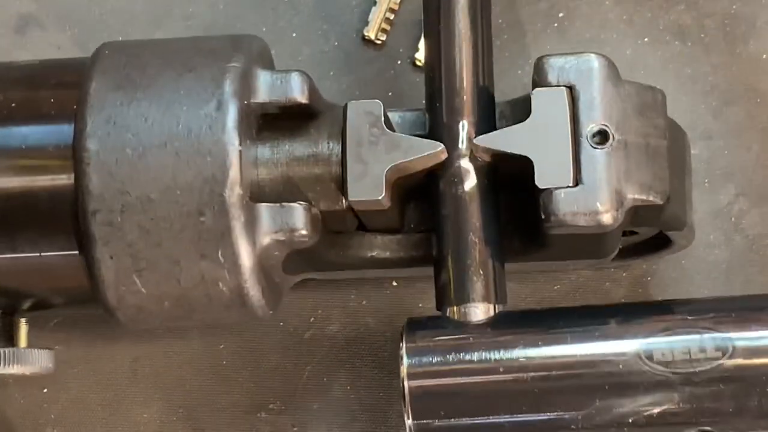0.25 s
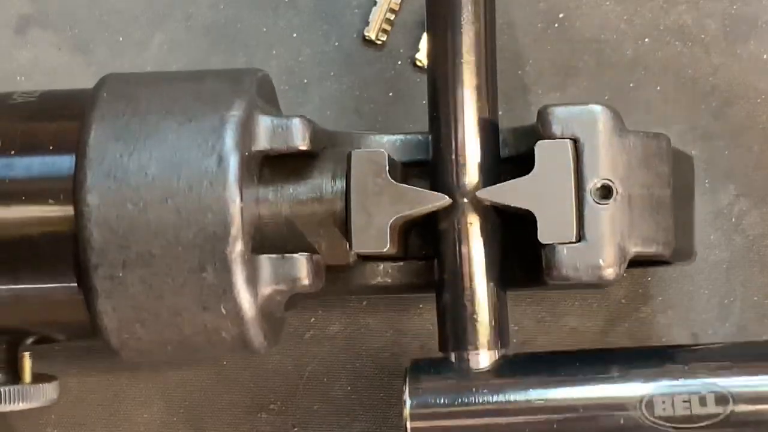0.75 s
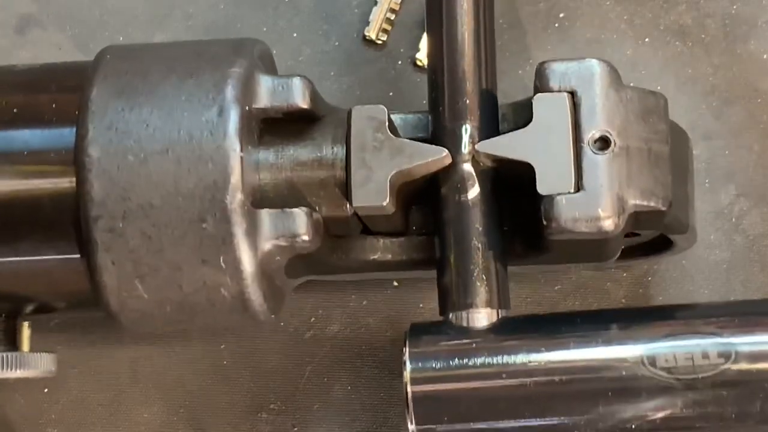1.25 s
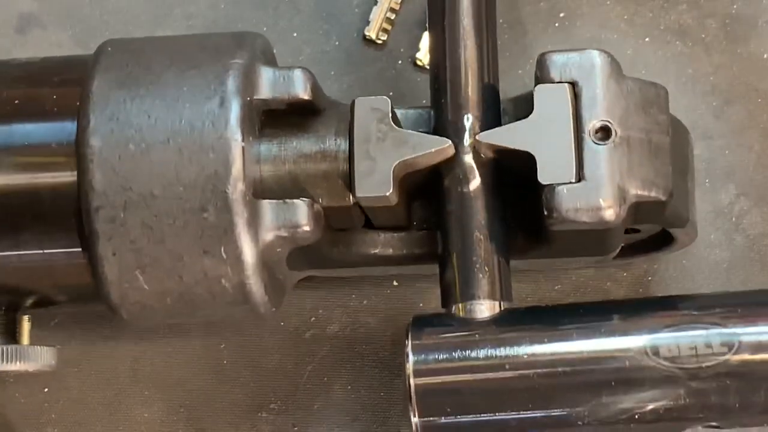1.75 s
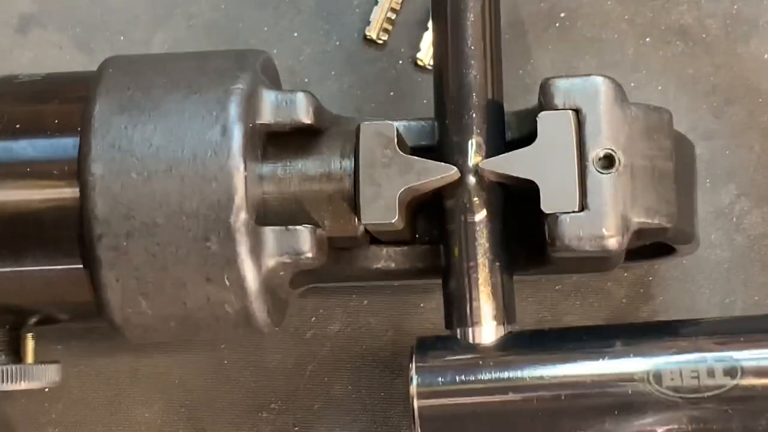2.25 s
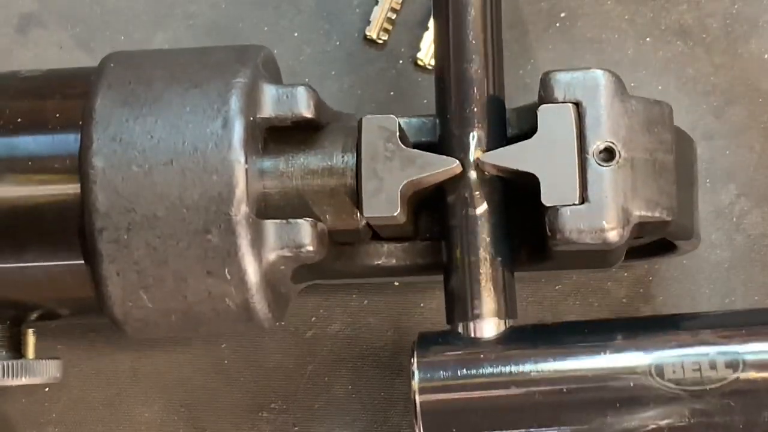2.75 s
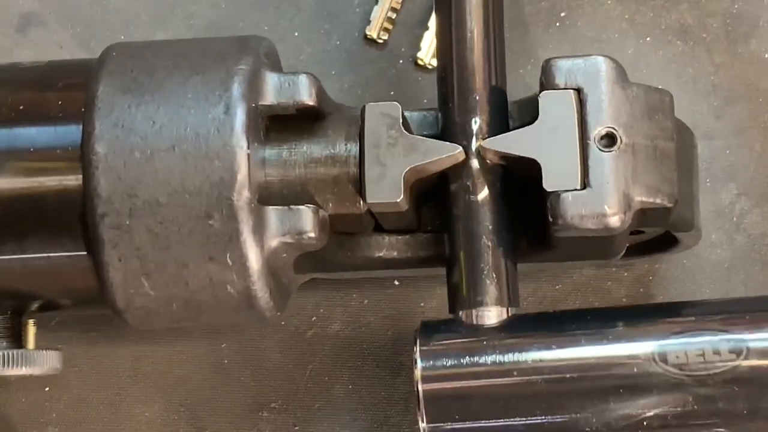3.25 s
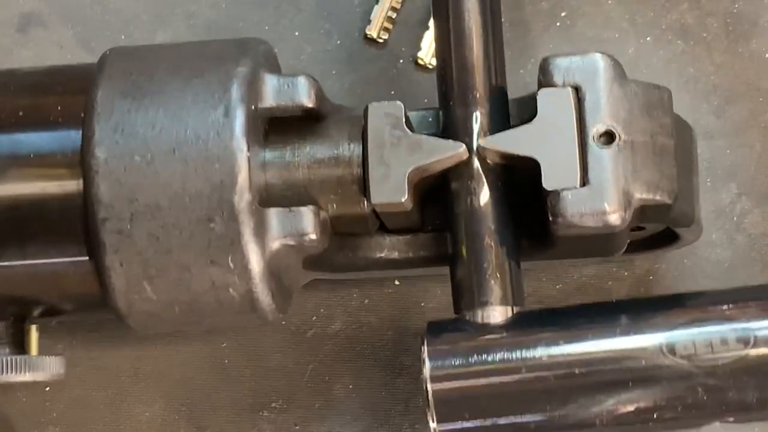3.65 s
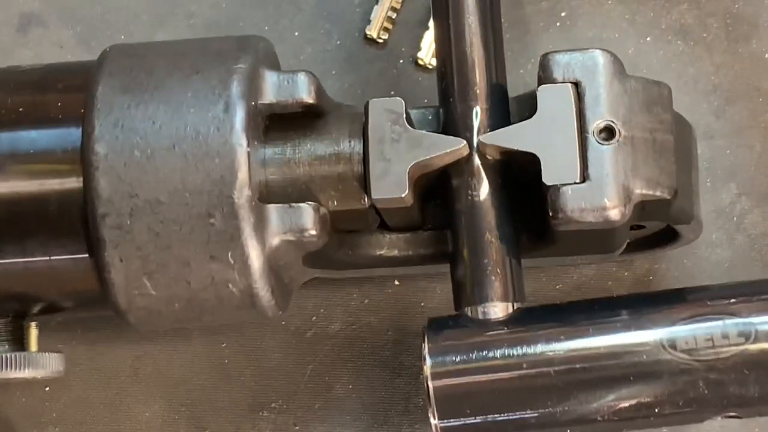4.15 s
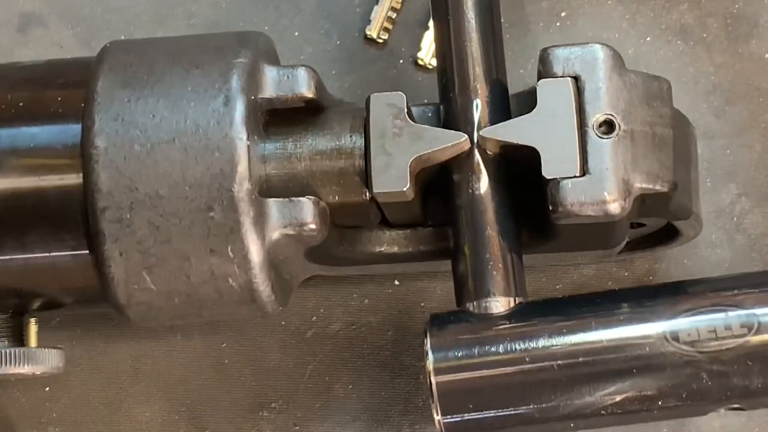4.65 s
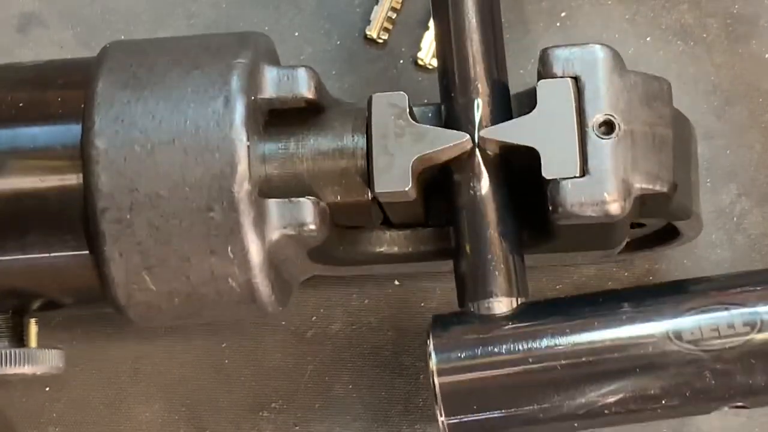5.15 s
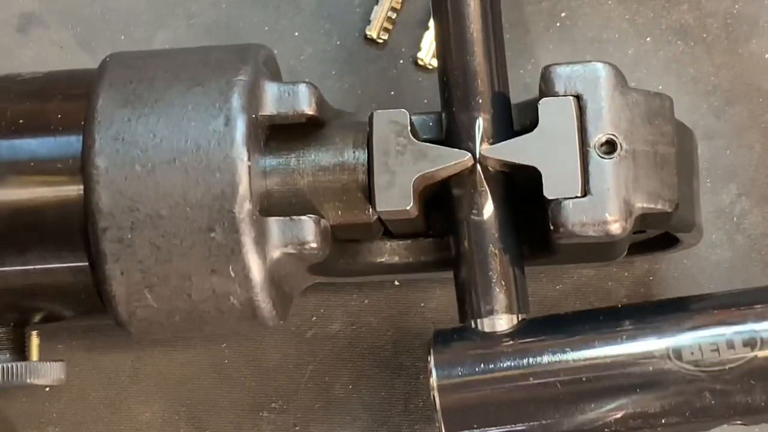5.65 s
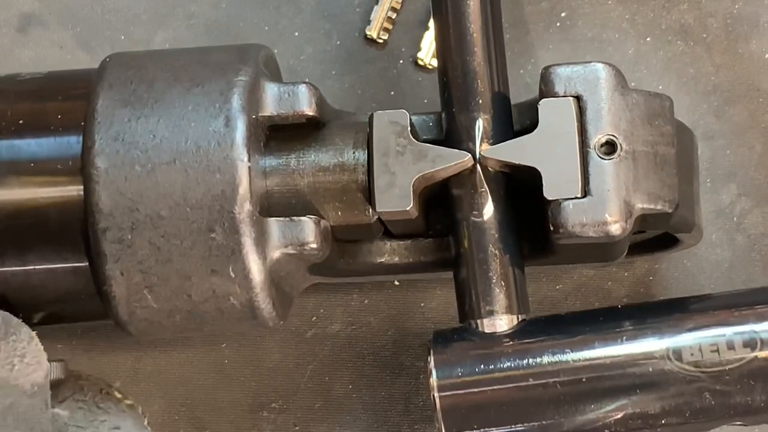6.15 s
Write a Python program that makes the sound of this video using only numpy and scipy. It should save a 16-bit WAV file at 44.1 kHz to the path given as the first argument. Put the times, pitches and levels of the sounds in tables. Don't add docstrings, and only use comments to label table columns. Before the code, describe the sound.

Seven lever strokes, roughly one every three quarters of a second, clack up and thud down on a resonant workbench. Small valves tick between them and loose keys jingle faintly. During the fifth stroke a steel shackle fractures with a violent, clipped bang, its halves ringing briefly in the short garage echo. The last strokes are easier, ending in faint rubbing, a tiny creak and low lamp hum.

```python
import sys
import numpy as np
from scipy import signal
from scipy.fft import rfft, irfft
from scipy.io import wavfile
from scipy.ndimage import uniform_filter1d

SR = 44100
rng = np.random.default_rng(int(sys.argv[2]) if len(sys.argv) > 2 else 0)


def linear_from_db(decibels):
    return 10 ** (np.asarray(decibels, float) / 20)


def dump_mix(stems):
    frames = np.atleast_2d(stems).T
    limited = np.clip(frames, -1, 1)
    pcm = np.round(limited * 32767).astype(np.int16)
    wavfile.write(sys.argv[1], SR, pcm)


N = 282681

# f/Hz, level/dB
CRACK_COLOUR = [(120, -31.5), (200, -4), (258, -22), (401, -10), (508, -9), (832, -10), (1360, -12.5),
                (2000, -9.5), (4200, -7.5), (5770, -13), (7400, -5.5), (9500, -13), (11000, -14.5),
                (12500, -20), (15800, -21.5)]
# f/Hz, T60/s
CRACK_T60 = [(200, 0.4), (1000, 0.31), (2500, 0.22), (4200, .3), (5700, .23), (8000, 0.17), (12000, 0.25),
             (16000, 0.23)]
# f/Hz, level/dB, T60/s
SHARD_MODES = [(335, -6, .2), (394, -2, .25), (3820, -7, .2), (4345, -7, .15), (7090, -4, .27),
               (7215, 0, .22), (8200, -6, .12), (8850, -13, .2), (9980, -12, .15), (10920, -3, .18),
               (12300, -14, .15), (15310, -16, .16)]
# t/s, main level/dB, upper level/dB, lower level/dB, damping factor/1
SHACKLE_KNOCKS = [(2.1, -41, -40, -36.5, 2.4), (2.109, -35.5, -34, -28.5, 1.5),
                  (2.558, -50, -41, -31.5, 0.7), (2.579, -40, -31, -50, 1.8), (2.596, -24, -27, -27.5, 1.8),
                  (2.619, -58, -34.5, -41, 1.4), (2.81, -18.5, -21, -23.5, 1.33),
                  (2.8197, -33, -28, -29.5, 1.5), (2.826, -30.5, -32, -32.5, 2.4),
                  (2.837, -32, -35, -32.5, 1.5), (3.27, -30.5, -32.5, -30, 1.7),
                  (3.286, -34, -22.5, -33.5, 1.3), (3.309, -21.5, -21.5, -24.5, 2.1),
                  (4.08, -32.5, -47, -38, 1.9)]
# f/Hz, level/dB, T60/s
STEEL_LOW = [(2640, -0.5, 0.086), (2770, -8.5, .06), (3094, -7.5, 0.035), (3640, -9, 0.074),
             (3950, -4, 0.14), (4340, -8.5, 0.088)]
# f/Hz, level/dB, T60/s
STEEL_FREE = [(7016, -16.5, 0.14), (7096, -3.5, 0.12), (7300, -9, 0.12), (7000, -16.5, 0.4)]
# f/Hz, level/dB, T60/s
STEEL_LOADED = [(7150, -5, 0.12), (7260, -14, 0.3), (7260, -16, .15), (7056, -23, 0.12)]
# f/Hz, level/dB, T60/s
STEEL_HIGH = [(9990, 3, 0.088), (10800, -11.5, .09), (11380, -10, 0.046), (11620, -5, 0.1),
              (12300, -10.5, .12), (13220, -14.5, .09), (14600, -7, .11), (16400, -10, .12)]
# f/Hz, level/dB
GRIND = [(800, -12), (1800, -6), (2700, -2), (4300, -7.5), (5500, -12), (8000, -23)]
# f/Hz, level/dB
JINGLE = [(4000, -28), (8000, 0.5), (12000, 6), (16000, -4)]
# t/s, level/dB
JAW_RINGS = [
    (2.118, -39),
    (2.835, -35),
]
# f/Hz, level/dB, T60/s
JAW_MODES = [(3940, -1, .2), (2040, -9, .12)]
# t/s, level/dB, damping factor/1
LOCK_HITS = [
    (2.845, -38, 1.3),
    (3.484, -14, 1.15),
    (4.277, -36, 1.5),
    (4.98, -37, 1.7),
]
# f/Hz, level/dB, T60/s
LOCK_MODES = [(1168, 0, .3), (1290, -10, 0.15), (2045, -9, 0.1)]
# t/s, chatter level/dB, treble over middle/dB, length/s, ping level/dB
TOP_CLACKS = [
    (0.301, -32.5, -8, 0.012, -31),
    (1.036, -45, -20, 0.0056, -47),
    (1.046, -27, -2.5, 0.0067, -30),
    (1.826, -28.5, -3.5, 0.012, -44),
    (1.89, -42, -6, 0.01, -66),
    (2.539, -23, 0.5, 0.0059, -31),
    (3.245, -30, -7.5, 0.011, -42.5),
    (4.064, -29.5, -5.5, 0.0079, -34.5),
    (4.761, -26.5, -0.5, 0.0064, -31),
]
# t/s, chatter level/dB, treble over middle/dB, length/s, ping level/dB
BOTTOM_CLACKS = [
    (0.61, -32, -23.5, 0.0056, -35),
    (1.397, -36, -60, 0.0043, -49),
    (2.094, -30.5, -18.5, 0.013, -35),
    (2.801, -32, -12.5, 0.023, -29),
    (4.227, -31.5, -24, 0.0078, -33.5),
    (4.2748, -41.5, -29, 0.005, -53),
    (4.931, -26.5, -18.5, 0.0058, -33),
]
# f/Hz, level/dB
CLACK_COLOUR = [(300, -26.5), (700, -7.5), (900, -6.5), (1400, -8.5), (2300, -6.5), (3100, -5.5),
                (5500, -9), (8000, -5), (11000, -8), (15800, -13)]
# f/Hz, level/dB, T60/s
LEVER_MODES = [(3075, -19, .06), (4450, -18, .025), (2120, -15, .02)]
# t/s, level/dB, f/Hz, T60/s
SNAPS = [(.3025, -29, 9500, 0.013), (1.0472, -19, 8000, .007), (2.539, -33, 9300, .02),
         (4.0655, -39, 7630, 0.01), (4.7616, -25, 8000, 0.007), (1.097, -47, 10400, .1),
         (2.608, -31, 2900, .025), (2.8095, -25, 2606, 0.04), (3.862, -52, 10100, .1),
         (3.864, -58, 12400, .07), (4.243, -46, 10150, .04), (4.259, -44, 10150, .06),
         (4.809, -57, 5200, .05), (4.809, -63, 12400, .05), (4.846, -56, 11600, .03),
         (4.945, -45, 10100, 0.05), (4.983, -59, 10400, .1), (4.95, -49, 11600, .035),
         (4.932, -35, 5100, 0.013), (4.229, -36, 5100, 0.013), (2.1095, -31, 12400, .012),
         (2.102, -40, 15000, .015), (1.843, -45, 10100, .05), (1.836, -37, 2050, .01),
         (0.349, -45, 12800, .03), (0.395, -47, 12800, .04), (0.622, -48, 11800, .03),
         (0.676, -54, 10400, .08), (2.571, -45, 11500, .03), (2.577, -35, 15000, .02),
         (4.135, -50, 15200, .02), (1.878, -44, 4200, .02), (5.051, -53, 11600, .04),
         (4.762, -41.5, 780, 0.061), (2.618, -39, 11600, .04), (2.836, -33, 2606, .03),
         (2.112, -32, 3400, .015), (2.565, -39, 4300, .04)]
# t/s, peak level/dB, treble over middle/dB
TICKS = [(0.062, -32, -2), (0.2335, -31.5, 7), (0.2875, -39, -18), (0.4734, -39.5, -19), (0.748, -43, -27),
         (0.813, -28.5, -9), (0.974, -47, -33), (1.327, -41, -31), (1.359, -33, -42), (1.6007, -29, -27),
         (1.7769, -29.5, 8), (1.926, -38, -38), (2.048, -43, -15), (2.3185, -33, 0), (2.5324, -32, -12),
         (3.017, -30, 6), (3.232, -37, -21.5), (3.804, -38, -4), (4.0428, -39.5, -12), (4.566, -39, -1.5),
         (4.7404, -38, -12.5), (4.8857, -49.5, -16), (0.007, -42, -2), (0.04, -37, -32), (2.083, -45, -25),
         (4.157, -39, -16.5), (0.3118, -34, -10), (0.368, -35.5, -1), (1.056, -33, -15), (1.108, -40, 3),
         (3.757, -38.5, -7.5), (4.2755, -37, -32), (2.76, -51, -25), (1.8185, -39, -20), (1.861, -39, -20),
         (1.878, -44, -2), (0.297, -43, 5), (4.488, -45.5, -30), (4.977, -38, -32), (2.1119, -25, -25),
         (2.579, -26, 4), (2.569, -28, -21), (3.282, -33, -21), (4.7575, -42, -0.5), (0.395, -40, -25)]
# f/Hz, level/dB
TICK_COLOUR = [(180, -38), (300, -7.5), (734, -3.5), (1520, -23), (2590, -8.5), (3490, -9.5), (3860, -14.5),
               (4260, -10), (15800, -35)]
# t/s, board level/dB, legs level/dB, knock level/dB, effort/dB
LIFTS = [
    (0.3149, -19, -22, -51, -1.5),
    (1.0584, -18, -20, -56, -2),
    (1.8375, -17.5, -19.5, -48, 2),
    (2.5495, -18, -23, -41, 1.5),
    (3.257, -17, -22, -43.5, -0.5),
    (4.072, -20, -44, -45.5, -25.5),
    (4.7686, -19, -40, -48, -42),
]
# t/s, board level/dB, knock level/dB, rebound delay/s, rebound knock level/dB
DROPS = [
    (0.6125, -14, -32, 0.039, -40),
    (1.3987, -18.5, -46.5, 0.04, -41),
    (2.0955, -15, -35, 0.044, -34.5),
    (2.8047, -12.5, -25.5, 0.061, -32),
    (3.4546, -3.5, -23, .065, -31),
    (4.23, -11, -29, 0.0445, -29.5),
    (4.933, -12, -27, 0.044, -31),
]
# t/s, board level/dB, legs level/dB, knock level/dB
JOLTS = [
    (0.003, -41.5, -37, -51),
    (3.435, -17, -18.5, -28),
    (3.474, -10.5, -35.5, -24),
    (3.5, -16.5, -20, -35),
    (4.739, -43, -58, -66),
]
# f/Hz, level/dB, T60/s
BOARD_HARD = [(118, -11, .27), (134, -6.7, .16), (160, -8, .06), (223, -19, .25), (262, -27, .15),
              (345, -24, .07)]
# f/Hz, level/dB, T60/s
BOARD_SOFT = [(119, -2, .1), (137, -16, .2), (165, -15, .06), (200, -19, .05), (285, -19, .026)]
# f/Hz, level/dB, T60/s
LEGS_HARD = [(42.8, -5, 0.19), (27.42, -21.5, .29)]
# f/Hz, level/dB, T60/s
LEGS_SOFT = [(33, -5, 0.17), (46, -21, .2)]
# f/Hz, level/dB
KNOCK = [(60, -28), (150, -2), (220, 5), (300, -9), (420, -3.5), (650, -12.5), (900, -12), (1500, -26),
         (4000, -45)]
# t/s, ring level/dB, jingle level/dB
KEY_HOPS = [(0.351, -50, -51), (.394, -53, -60), (.622, -52.5, -55), (.638, -45, -52), (.65, -49, -56),
            (1.094, -46, -54.5), (1.435, -52, -59), (1.874, -42, -49.5), (3.645, -61.5, -50),
            (3.862, -70.5, -63.5), (4.135, -56, -59.5), (4.243, -42, -43), (4.845, -63, -65.5),
            (4.943, -45, -42.5), (5.05, -64, -60), (4.259, -55, -51), (2.579, -49.5, -35),
            (2.622, -54.5, -42.5), (3.287, -52, -40), (3.332, -56.5, -42), (2.822, -49.5, -38.5)]
# f/Hz, level/dB, T60/s
KEY_MODES = [(7106, -2, 0.037), (9800, 1.5, 0.04), (10600, -2.5, .05), (12710, 0.5, 0.028),
             (15630, -4.5, .03)]
# t/s, level/dB, half length/s
GUSHES = [
    (0.406, -51, 0.054),
    (1.137, -48.5, 0.03),
    (1.19, -55.5, 0.039),
    (1.924, -46, 0.047),
    (2.648, -48.5, 0.057),
    (3.329, -48.5, 0.0264),
    (5.551, -61.5, 0.052),
]
# f/Hz, level/dB
GUSH = [(200, 5.5), (400, -0.5), (660, 1), (1500, -6.5), (2500, -16), (6000, -30)]
# t/s, level/dB, half length/s
SQUEEZES = [
    (4.905, -54.5, 0.03),
    (4.8, -63, .03),
    (2.565, -47, 0.016),
    (1.4, -56.5, 0.027),
    (4.195, -59, .035),
]
# t/s, level/dB, half length/s
BRUSHES = [
    (1.54, -66, 0.025),
    (2.07, -57.5, 0.028),
    (2.77, -61, 0.055),
    (4.195, -57, 0.0404),
    (1.09, -59, .03),
    (3.33, -46, 0.018),
    (5.28, -64.5, 0.053),
    (5.54, -62.5, 0.086),
    (5.74, -62, 0.034),
]
# f/Hz, level/dB
RUSTLE = [(800, -21.5), (2000, -1.5), (3500, -2), (7000, -7), (12000, -14), (16000, -18)]
# t/s, level/dB, half length/s
CREAKS = [
    (5.57, -60, 0.095),
]
# f/Hz, level/dB
CREAK = [(220, -31), (290, -1.5), (320, -5.5), (400, -12), (900, -39)]
# rest level/dB, press level/dB, level after a drop/dB, decay/s
HANDLING_LAYERS = [(-43.5, -35, -44.5, .1), (-50, -41.5, -45.5, 0.24), (-72, -55.5, -58.5, 0.057),
                   (-75.5, -71.5, -51.5, 0.051)]
# f/Hz, level/dB
SHAKE = [(12, -24), (20, 2), (55, -2.5), (81, -21.5), (113, -10), (176, -19.5), (300, -27.5), (390, -60.5),
         (660, -120)]
# f/Hz, level/dB
SCUFF = [(150, -26.5), (250, 5.5), (650, -4.5), (1200, -13), (2000, -13.5), (4000, -38.5)]
# f/Hz, T60/s
GARAGE_T60 = [(100, 0.17), (500, 0.49), (2000, 0.39), (6000, 0.39), (12000, 0.16)]
# f/Hz, rms level/dB
HUM = [(360.7, -70), (479.1, -70), (597.5, -76.5), (721.4, -81), (839.8, -81)]
# f/Hz, level/dB
AIR = [(15, -13), (30, -0.5), (60, -8.5), (115, -19.5), (160, -40.5), (210, -37.5), (300, -28),
       (700, -34.5), (1200, -36), (3000, -43.5), (6000, -44.5), (6500, -38.5), (7000, -45.5), (15800, -49)]

LIFT_RISE_S, DROP_RISE_S, REBOUND_RISE_S = 0.003, 0.001, 0.002


def evened(x):
    return x / np.sqrt(np.mean(x ** 2) + 1e-20)


def read(points, hz):
    f, value = np.transpose(points)
    return np.interp(np.log(hz + 1), np.log(f + 1), value)


def add(mix, s, sound):
    part = mix[round(s * SR):][:len(sound)]
    part += sound[:len(part)]


def coloured(x, points, tilt_db=0.0):
    hz = np.fft.rfftfreq(len(x), 1 / SR)
    tilt = tilt_db / (1 + (6000 / (hz + 1)) ** 4)
    return irfft(rfft(x) * linear_from_db(read(points, hz) + tilt), len(x))


def ring(modes, damping=0.77, rise_s=1e-4, spread=0.0, blur_hz=0.0, lasts_s=0.5):
    t = np.arange(round(SR * lasts_s)) / SR
    hz, db, t60_s = np.transpose(modes)[:, :, None]
    luck = rng.standard_normal((4, len(modes), 1))
    hz = hz * (1 + 0.006 * spread * luck[0])
    sines = 0
    for share, offset in [(0.95, 0.0082), (0.99, luck[2]), (0.7, luck[3])]:
        sines = sines + share * np.sin(2 * np.pi * (hz + blur_hz * offset) * t)
    fall_db = 3 * spread * luck[1] - 60 * t * damping / t60_s
    attack = 1 - np.exp(-t / rise_s)
    return -(linear_from_db(db + fall_db) * sines / 2).sum(0) * attack


def puff(colour, tilt_db, length_s, grainy_db, order=1):
    t = np.arange(8192) / SR
    noise, size = rng.standard_normal((2, len(t)))
    grains = linear_from_db(min(grainy_db, 4) * evened(uniform_filter1d(size, size=40)))
    attack = 1 - np.exp(-t * 4000)
    decay = np.exp(-(t / max(length_s, 1e-3)) ** order)
    return evened(coloured(noise, colour, tilt_db)) * grains * decay * attack


def swells(rows, colour, lumpy_db):
    t = np.arange(N) / SR
    swell = sum(linear_from_db(db) * np.exp(-((t - s) / half_s) ** 2) for s, db, half_s in rows)
    flow, lumps = rng.standard_normal((2, N))
    lumps = linear_from_db(lumpy_db * evened(uniform_filter1d(lumps, size=250)))
    return swell * evened(coloured(flow, colour) * lumps)


def crack():
    crack_s, noise_db, ring_db, shards_db = 3.4308, 4.5, -7, -14
    hz, t, z = signal.stft(rng.standard_normal(SR), SR, nperseg=256)
    z = z * linear_from_db(read(CRACK_COLOUR, hz)[:, None] - 60 * t / read(CRACK_T60, hz)[:, None])
    flutter = uniform_filter1d(rng.standard_normal(z.shape), size=14, axis=0)
    flutter = uniform_filter1d(flutter, size=3, axis=1)
    z = z * linear_from_db(2.4 * evened(flutter))
    burst = signal.istft(z, SR, nperseg=256)[1][:SR]
    punch = 1 + 1.6 * np.exp(-np.arange(SR) / (SR * 0.008))
    burst = burst / np.std(burst[:800]) * punch
    out = np.zeros(N)
    add(out, crack_s, linear_from_db(noise_db - 11.0) * burst)
    for delay_s, db in [(0.001, 1.5), (0.007, -6.5), (0.03, -8.5)]:
        level_db = ring_db + db
        add(out, crack_s + delay_s, shackle(level_db, level_db - 6.5, level_db - 10.5, 1.0))
    shards = ring(SHARD_MODES, 0.91, rise_s=0.0012, blur_hz=40.06)
    add(out, crack_s + 0.0022, linear_from_db(shards_db) * shards)
    return out


def shackle(main_db, upper_db, lower_db, damping, main_modes=STEEL_FREE):
    main = ring(main_modes, damping, spread=0.19, blur_hz=7.8)
    upper = ring(STEEL_HIGH, damping, spread=0.32, blur_hz=45.1)
    lower = ring(STEEL_LOW, damping, spread=0.16, blur_hz=80.0)
    add(upper, 0, linear_from_db(-10.0) * puff(JINGLE, 0.0, 0.022, grainy_db=2.5))
    add(lower, 0, linear_from_db(0.5) * puff(GRIND, 0.0, 0.013, grainy_db=3.0))
    return linear_from_db(main_db - 1) * main + linear_from_db(upper_db - 4.0) * upper + linear_from_db(lower_db - 4.0) * lower


def steel():
    out = np.zeros(N)
    for s, *knock in SHACKLE_KNOCKS:
        is_free = any(0 < s - drop[0] < 0.06 for drop in DROPS)
        add(out, s, shackle(*knock, STEEL_FREE if is_free else STEEL_LOADED))
    for s, db in JAW_RINGS:
        add(out, s, linear_from_db(db) * ring(JAW_MODES, rise_s=0.011, blur_hz=25.13))
    return out


def lock_body():
    out = np.zeros(N)
    for s, db, damping in LOCK_HITS:
        add(out, s, linear_from_db(db) * ring(LOCK_MODES, damping, rise_s=0.02, blur_hz=0.3))
    return out


def clacks():
    top_ping_hz, bottom_ping_hz, ping_t60_s = 3066, 2594, 0.022
    out = np.zeros(N)
    rows = [(*r, top_ping_hz) for r in TOP_CLACKS] + [(*r, bottom_ping_hz) for r in BOTTOM_CLACKS]
    for s, db, treble_db, length_s, ping_db, hz in rows:
        contact = puff(CLACK_COLOUR, treble_db + 6.5, 0.0018, grainy_db=-1.5)
        chatter = puff(CLACK_COLOUR, treble_db + 0.72, 1.4 * length_s, grainy_db=2.5, order=2)
        ping = ring([(hz, 0, ping_t60_s)], rise_s=0.002, blur_hz=70.0, lasts_s=0.05)
        add(out, s, linear_from_db(db - 11.0) * contact)
        add(out, s, linear_from_db(db - 7.0) * chatter)
        add(out, s + 0.002, linear_from_db(ping_db + 6) * ping)
    for s, *_, ping_db in TOP_CLACKS:
        lever = ring(LEVER_MODES, rise_s=0.0005, spread=0.3, blur_hz=55.0, lasts_s=0.15)
        add(out, s + 0.001, linear_from_db(ping_db + 6.5) * lever)
    for s, db, hz, t60_s in SNAPS:
        add(out, s, linear_from_db(db) * ring([(hz, 0, t60_s)], rise_s=0.0007, blur_hz=2 / t60_s, lasts_s=0.12))
    return out


def ticks():
    out = np.zeros(N)
    for s, db, treble_db in TICKS:
        add(out, s, linear_from_db(db - 11.0) * puff(TICK_COLOUR, treble_db + 7.0, length_s=0.0042, grainy_db=3.0))
    return out


def blows():
    rows = [(*r[:4], LIFT_RISE_S) for r in LIFTS] + [(*r, DROP_RISE_S) for r in JOLTS]
    rock_s = 0.122
    for s, db, knock_db, rebound_s, rebound_knock_db in DROPS:
        rows.append((s, db, db + 0.7, knock_db, DROP_RISE_S))
        rows.append((s + rebound_s, db - 22, db - 24, rebound_knock_db, REBOUND_RISE_S))
        rows.append((s + rock_s, db - 26.5, db - 12, knock_db - 21.0, REBOUND_RISE_S))
    return rows


def bench():
    out = np.zeros(N)
    for s, board_db, legs_db, knock_db, rise_s in blows():
        if rise_s == LIFT_RISE_S:
            board, legs, lag_s = BOARD_SOFT, LEGS_SOFT, 0.0045
        else:
            board, legs, lag_s = BOARD_HARD, LEGS_HARD, 0.0028
        add(out, s, linear_from_db(board_db) * ring(board, 1.0, rise_s, blur_hz=0.5, lasts_s=0.3))
        add(out, s + lag_s, -linear_from_db(legs_db) * ring(legs, 1.0, rise_s=0.002))
        add(out, s, linear_from_db(knock_db) * puff(KNOCK, 0.0, 0.024, grainy_db=1.5))
    return out


def keys():
    out = np.zeros(N)
    for s, ring_db, jingle_db in KEY_HOPS:
        add(out, s, linear_from_db(ring_db) * ring(KEY_MODES, rise_s=0.0015, spread=0.8, blur_hz=200.0, lasts_s=0.12))
        add(out, s, linear_from_db(jingle_db) * puff(JINGLE, 0.0, 0.0081, grainy_db=5.5))
    return out


def oil_and_rubbing():
    oil = swells(GUSHES, GUSH, lumpy_db=3.5)
    gloves = swells(BRUSHES, RUSTLE, lumpy_db=1.0)
    creak = swells(CREAKS, CREAK, lumpy_db=-0.5)
    jaws = swells(SQUEEZES, GRIND, lumpy_db=2.0)
    return oil + gloves + creak + jaws


def stirred(rest_db, press_db, drop_db, decay_s, let_go_db):
    press_rise_s, sag_db_per_s, release_s = 0.044, 18.0, 0.04
    t = np.arange(0, N / SR + 0.002, 0.001)
    level = linear_from_db(rest_db + let_go_db * np.interp(t, (5.05, 5.6), (0, 1)))
    for (start, *_, effort_db), (end, _, knock_db, *_) in zip(LIFTS, DROPS):
        held = np.clip((t - start) / press_rise_s + 1, 0, 1)
        held = held * np.exp(-np.maximum(t - end, 0) / release_s)
        sag_db = sag_db_per_s * np.maximum(t - start, 0)
        level += held * linear_from_db(press_db + effort_db - sag_db)
        after_db = drop_db + 0.6 * (knock_db + 30.5)
        level += (t > end) * linear_from_db(after_db) * np.exp(-abs(t - end) / decay_s)
    return np.interp(np.arange(N) / SR, t, level)


def handling():
    a, b, c, d, e = rng.standard_normal((5, N))
    patches = linear_from_db(2.5 * evened(uniform_filter1d(e, size=500)))
    sway = evened(coloured(a, [(1, -11.5), (3, 9.0), (8, -1.0), (20, -9.5), (40, -78.0)]))
    shake = evened(coloured(b, SHAKE))
    scuff = evened(coloured(c, SCUFF) * patches)
    rustle = evened(coloured(d, RUSTLE) * patches)
    let_go_db = [-1.5, -8, -4, -2.5]
    layers = zip(HANDLING_LAYERS, let_go_db, [sway, shake, scuff, rustle])
    return sum(stirred(*row, change_db) * noise for row, change_db, noise in layers)


def garage(x):
    taps = np.zeros(SR)
    at = np.arange(200, SR - 20, 20)
    taps[at + rng.integers(0, 20, len(at))] = rng.choice([-1.0, 1.0], len(at))
    hz, t, z = signal.stft(taps, SR, nperseg=256)
    decay = linear_from_db(-60 * t / read(GARAGE_T60, hz)[:, None])
    tail = signal.istft(z * decay, SR, nperseg=256)[1]
    return signal.fftconvolve(x, tail / np.linalg.norm(tail))[:N]


def room_tone():
    t = np.arange(N) / SR
    drift = uniform_filter1d(rng.standard_normal((len(HUM), N)), size=6000, axis=1)
    waver = linear_from_db(3.3 * evened(drift))
    hum = np.zeros(N)
    for (hz, rms_db), w in zip(HUM, waver):
        hum += np.sqrt(2) * linear_from_db(rms_db) * w * np.sin(2 * np.pi * (hz * t + rng.random()))
    air = evened(coloured(rng.standard_normal(N), AIR))
    return linear_from_db(-52.5) * air + hum


def scene():
    metal = ticks() + clacks() + steel() + keys() + crack()
    lock, wood = lock_body(), bench()
    wet = garage(linear_from_db(-13.0) * metal + linear_from_db(-10.5) * wood)
    return (metal + lock + wood + wet + oil_and_rubbing() + handling() + room_tone())[None]


def top_cut(x):
    return signal.sosfilt(signal.butter(12, 15930, fs=SR, output="sos"), x)


def record(dry):
    clipped = np.clip(dry, -0.88, 0.88)
    edge_hz = 15950
    low_pass = signal.firwin(511, edge_hz, window=("kaiser", 9), fs=SR)
    limited = signal.oaconvolve(clipped, low_pass[None], "same", axes=1)
    return top_cut(limited)


dry = scene()
out = record(dry)
dump_mix(out)
```